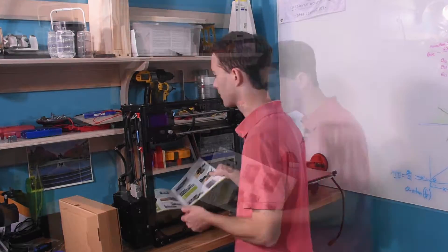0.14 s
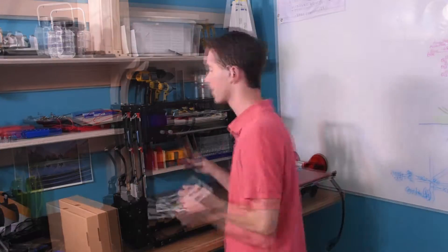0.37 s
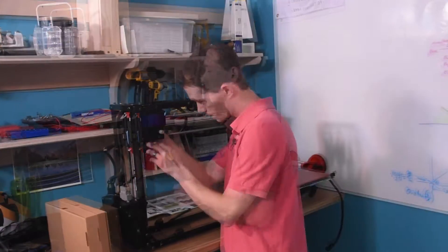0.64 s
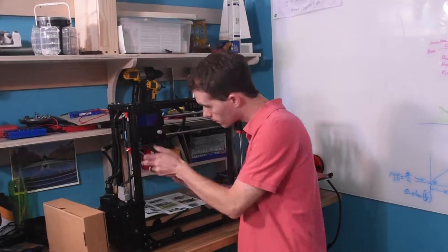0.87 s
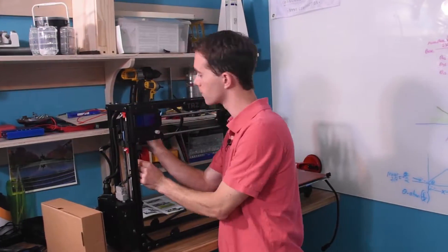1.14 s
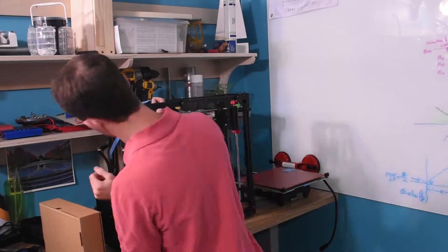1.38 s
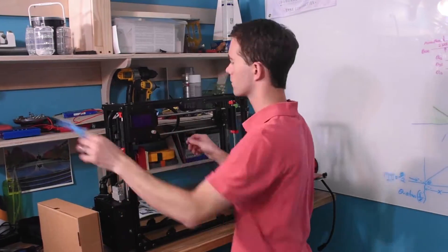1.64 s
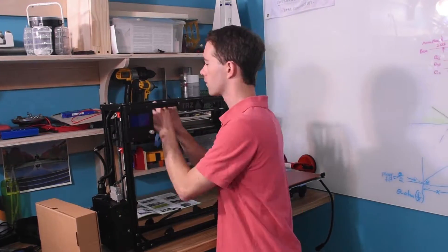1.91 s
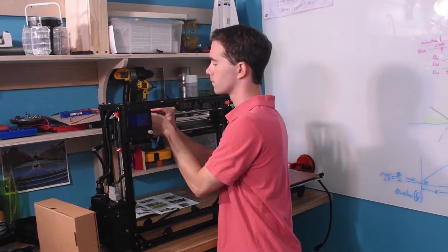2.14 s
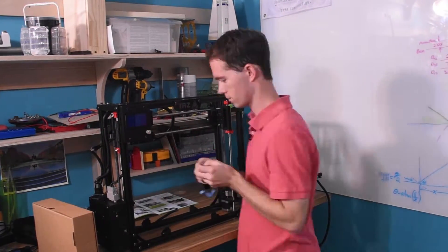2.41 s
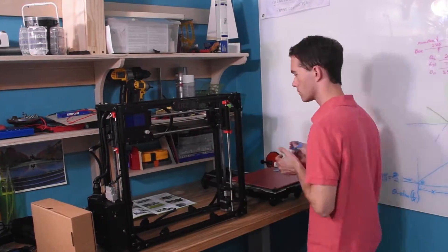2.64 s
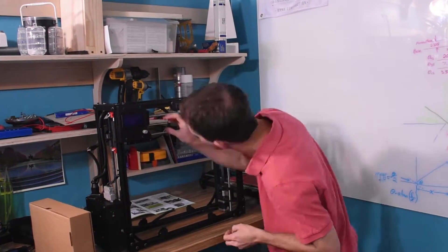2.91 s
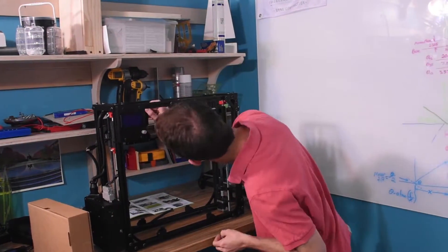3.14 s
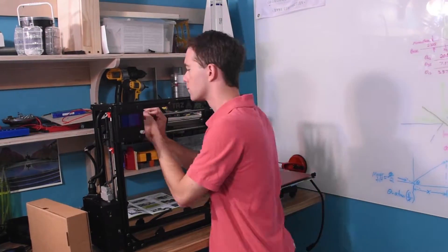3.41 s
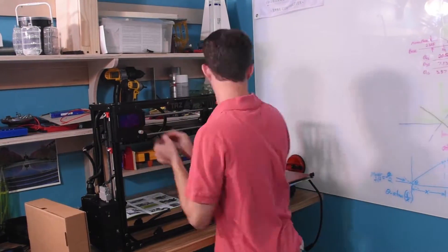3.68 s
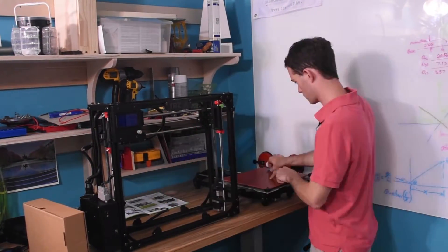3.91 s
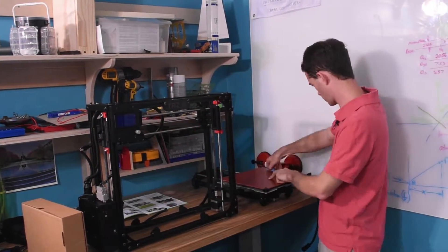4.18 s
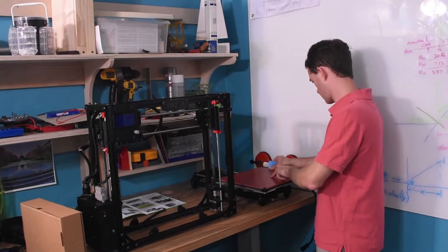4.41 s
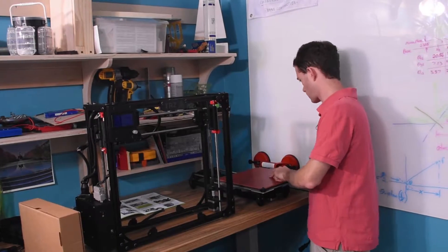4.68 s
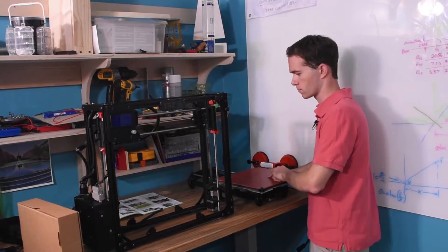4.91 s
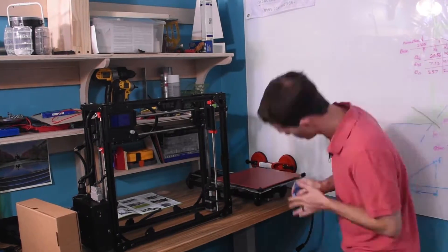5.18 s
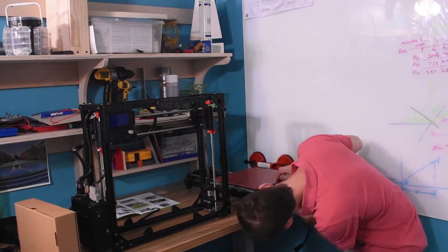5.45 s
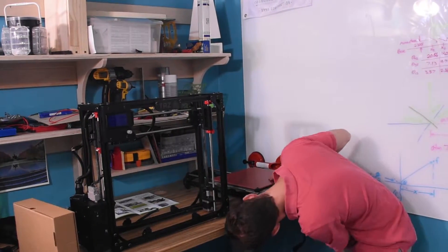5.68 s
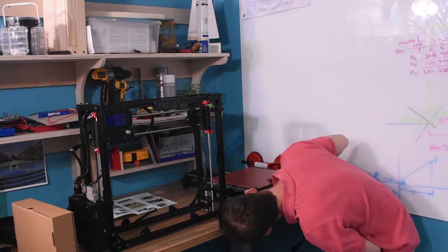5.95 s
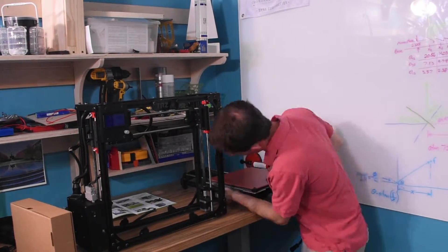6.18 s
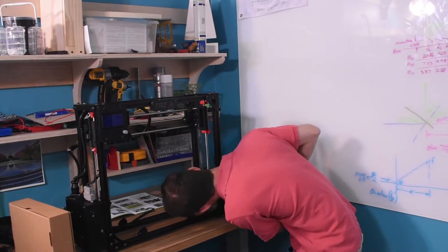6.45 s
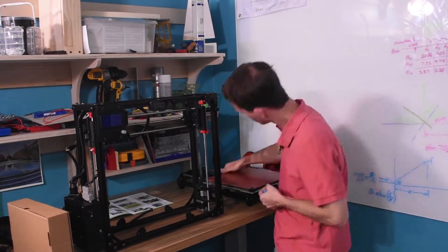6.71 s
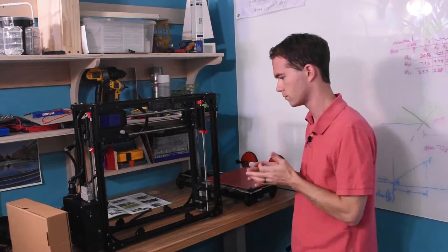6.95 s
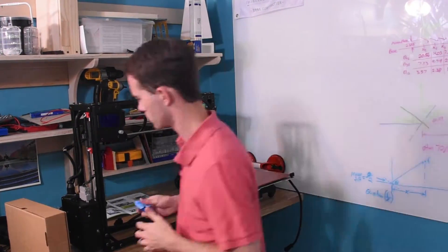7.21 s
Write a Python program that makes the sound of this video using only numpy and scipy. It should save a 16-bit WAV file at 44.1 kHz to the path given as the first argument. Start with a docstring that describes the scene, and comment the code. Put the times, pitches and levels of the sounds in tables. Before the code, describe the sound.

Paper rubs softly and a booklet smacks a wooden bench, the hardest hit slightly saturated. The sound then jumps to time-lapse handwork at a metal frame: tiny high snaps, short crackling runs, faint taps of small parts and a growing peel of sticky tape. The indoor echo turns short and high, above quiet thin hiss, unsteady hum and an intermittent whistle.

```python
"""In a workshop, a paper booklet rustles and is knocked down on a wooden bench; then the sound jumps to tape work
sped up like a time-lapse, all high and thin: sticky tape is picked and peeled off a metal frame over a thin hiss.
Paper is filtered random clicks, a blow is a burst of noise plus dying sines, and tape is short snaps of noise,
crackling runs and a steady pull. Small parts ring when tapped. Behind the work are patchy hiss, a wavering hum,
faint steady tones and a thin whistle that comes and goes."""
import sys
import numpy as np
from scipy import signal
from scipy.io import wavfile
from scipy.ndimage import uniform_filter1d

SR = 44100
rng = np.random.default_rng(int(sys.argv[2]) if len(sys.argv) > 2 else 0)


def field_ratio(decibels):
    """Amplitude ratio for a level in dB (20 dB per decade); scalars and array-likes work."""
    return 10 ** (np.asarray(decibels, dtype=float) / 20)


def unload_wav(signal):
    """Save mono or channel-first audio to the path in sys.argv[1] as 16-bit WAV at rate SR, clipped to [-1, 1]."""
    wavfile.write(
        sys.argv[1],
        SR,
        np.round(np.clip(np.atleast_2d(signal).T, -1, 1) * 32767).astype(np.int16),
    )


N = 323253  # samples, about 7.3 s
T = np.arange(N) / SR  # time of each sample, s
HZ = np.fft.rfftfreq(4096, 1 / SR)  # frequencies at which filters are drawn
CHANGE_S = .481  # the bench sound stops here and the sped-up tape work takes over


# the ticks of tape letting go that stand out:
# (t/s, peak level/dB, brightness/octaves above 1 kHz, held to 4 at most)
TAPE_TICKS = [(0.941, -28, 2.53), (1.0075, -33, 2.95), (1.183, -21.5, 3.15), (1.2286, -22.5, 1.93),
              (1.6534, -28, 2.5), (1.8073, -23.5, 2.38), (2.0918, -26, 3.05), (2.2404, -23, 2.9),
              (2.3626, -24.5, 1.73), (2.595, -22, 3.9), (2.6872, -14, 2.97), (2.7865, -22, 3.6),
              (2.8608, -20.5, 3.7), (2.938, -31.5, 4.2), (2.9654, -27.5, 4.4), (3.016, -39, 1.9),
              (3.304, -29, 4), (3.7782, -13, 3.7), (3.8364, -26, 3.54), (3.866, -19.5, 3.9),
              (4.1165, -18.5, 2.97), (4.3113, -20, 2.93), (4.3518, -21, 3.27), (4.3762, -24.5, 2.8),
              (4.3943, -24, 2.7), (4.4174, -20, 2.44), (4.4435, -24, 2.1), (4.4617, -26, 1.8),
              (4.5033, -22.5, 2.73), (4.5455, -5, 3.3), (4.556, -18, 2.7), (4.6134, -27.5, 2.6),
              (4.9093, -27, 2.38), (5.0416, -8.5, 3.6), (5.1165, -29, 2.8), (5.195, -17, 3.65),
              (5.2557, -23, 3.1), (5.342, -17, 2.2), (5.403, -17.5, 3), (5.4368, -19, 4),
              (5.4487, -21, 3.26), (5.4677, -24, 4.3), (5.5052, -17, 3.32), (5.6533, -19, 3.6),
              (5.729, -22.5, 3.4), (5.8026, -22, 3.6), (5.866, -16, 2.73), (5.889, -18, 3),
              (5.8975, -12.5, 2.84), (5.9416, -20, 4.1), (5.9975, -17, 3.9), (6.0126, -19, 3.35),
              (6.026, -22.5, 4.4), (6.0564, -18.5, 2.7), (6.129, -25.5, 2.9), (6.213, -27, 1.74),
              (6.2337, -24.5, 3), (6.2547, -11, 3.1), (6.281, -16.5, 2.8), (6.3096, -11, 3.6),
              (6.333, -27, 3.4), (6.368, -27.5, 3.6), (6.431, -29.5, 2.8), (6.5131, -5.5, 2.55),
              (6.5962, -10.5, 2.14), (6.6596, -18.5, 2.35), (6.718, -19.5, 2.3), (6.7557, -13, 4.2),
              (6.7673, -11, 3.96), (6.8032, -12, 3.85), (6.8216, -21, 3.8), (6.8576, -14.5, 3.5),
              (6.8872, -12.5, 3.68), (6.913, -15, 3.2), (6.9458, -17.5, 3.4), (6.9963, -8, 3.32),
              (7.0115, -10, 4.9), (7.0397, -10, 3.64), (7.06, -10, 3.6), (7.0915, -9.5, 4.6),
              (7.1096, -9, 3.67), (7.1433, -11.5, 4), (7.2502, -20.5, 3.34)]


def ticks():
    """Each tick is a snap of well under a millisecond, with a faint creak before and a rattle after."""
    t = np.arange(-200, 700) / SR  # the snap itself is at t = 0
    out = np.zeros(N)
    for s, db, octaves in TAPE_TICKS:
        creak = 0.062 * field_ratio(60 * t / 0.009)
        snap_and_rattle = field_ratio(-60 * abs(t) / 0.0015) + 0.14 * field_ratio(-60 * abs(t) / 0.024)
        noise = rng.standard_normal(len(t)) * np.where(t < 0, creak, snap_and_rattle)
        snap = tinted(noise, hump(octaves, below_db=9.5, above_db=5.5))
        tick = through_frame(snap, share_db=-2.5)
        add(out, s + t[0], field_ratio(db) * tick / abs(tick).max())
    return out


# crackling runs and scuffs:
# (t/s, length/s, level/dB, brightness/octaves above 1 kHz, held to 4 at most)
CRACKLING_RUNS = [(0.477, 0.01, -28, 2.4), (0.52, 0.007, -43, 2.2), (0.845, 0.044, -40.5, 2.2),
                  (1.229, 0.053, -49, 2.7), (1.613, .04, -54.5, 2.6), (1.869, 0.032, -55.5, 0.92),
                  (2.036, .015, -53, 2.46), (2.35, 0.012, -42, 1.77), (2.577, 0.027, -48.5, 1.55),
                  (2.744, 0.021, -34.5, 3.56), (2.792, 0.057, -46.5, 3.67), (2.871, 0.041, -52.5, 2.6),
                  (3.284, 0.042, -60, 0.71), (4.032, 0.026, -46.5, 2.27), (4.111, 0.014, -39, 2.9),
                  (4.381, 0.075, -51.5, 2.4), (4.534, 0.024, -32.5, 2.66), (4.748, 0.028, -49, 1.93),
                  (4.896, 0.033, -45, 2.1), (5.035, .013, -30.5, 2.18), (5.109, 0.02, -46, 1.6),
                  (5.186, 0.018, -39.5, 1.74), (5.233, 0.039, -44, 2.63), (5.31, 0.05, -47, 1.44),
                  (5.386, 0.022, -43, 3.13), (5.644, 0.012, -34, 2.6), (5.728, 0.0082, -37.5, 3.04),
                  (5.801, 0.09, -48.5, 2.8), (5.894, 0.023, -33, 1.66), (5.998, 0.018, -42, 4.5),
                  (6.63, 0.012, -44, 3.2), (6.666, 0.026, -35, 1.83), (6.761, 0.054, -48.5, 3.4),
                  (6.876, .065, -45, 3.9), (6.975, 0.017, -28, 4.5), (7.014, .055, -39.5, 3.8),
                  (7.075, 0.068, -38, 3.94)]


def runs():
    """Glue threads tear in a spiky flurry that swells and trails off."""
    rise_share = 0.29  # part of the run's length spent swelling
    threads = grains(per_s=1100, spread_db=4.5) + 0.32 * rng.standard_normal(N)
    out = np.zeros(N)
    for s, length, db, octaves in CRACKLING_RUNS:
        t = np.arange(round((length + .04) * SR)) / SR  # leaves room for the trailing end
        swell = np.clip(t / (0.0016 + rise_share * length), 0, 1)
        trail = field_ratio(-60 * np.maximum(t - length, 0) / 0.026)
        piece = threads[round(s * SR):][:len(t)]
        flurry = tinted(piece, hump(octaves, below_db=8, above_db=4.5))
        flurry = evened(through_frame(flurry, share_db=-2.5))
        add(out, s, field_ratio(db) * flurry * swell * trail)
    return out


# steady pull on the tape: (t/s, level/dB, dullness/0 to 1)
TAPE_PULL = [(0.47, -64, 0.92), (3.68, -73.5, 0.08), (5.07, -59, 0.82), (6.58, -61, 0.4), (6.91, -63, 0.5),
             (7.33, -56, 0.01)]
# relative spectrum of the tearing film: (f/Hz, level/dB per Hz)
FILM_SPECTRUM = [(500, -49), (3000, -25.5), (6000, -14), (10000, 1.5), (14000, 2.5), (17000, -12.5)]
# relative spectrum of the fingers: (f/Hz, level/dB per Hz)
FINGER_SPECTRUM = [(300, -29.5), (1200, -7.5), (2800, 0.5), (5500, -1), (9000, -12), (17000, -19)]


def peel():
    """Glue threads tear in dense random snaps; a duller pull is more finger than film."""
    s, db, dull = np.transpose(TAPE_PULL)
    level = field_ratio(np.interp(T, s, db))
    dull = np.clip(np.interp(T, s, dull), 0, 1)
    film = evened(tinted(grains(per_s=2700, spread_db=7.0), FILM_SPECTRUM))
    fingers = evened(tinted(grains(per_s=3700, spread_db=8.0), FINGER_SPECTRUM))
    return level * (np.sqrt(1 - dull) * film + np.sqrt(dull) * fingers)


# taps on small loose parts: (t/s, peak level/dB, f/Hz)
PART_TAPS = [(4.046, -47, 2750), (4.055, -41, 4160), (4.1154, -28, 4220), (4.312, -36, 4155),
             (4.336, -45, 4190), (2.354, -56, 612), (4.906, -32, 4400), (5.9, -37.5, 2000),
             (6.677, -32, 1343), (6.801, -43, 4200)]


def taps():
    """Each small part rings briefly on its own pitch, with a weaker ring just above it."""
    out = np.zeros(N)
    for s, db, hz in PART_TAPS:
        modes = [(hz, 0, .045), (1.04 * hz, -7, .03)]
        add(out, s, field_ratio(db) * ring(modes, length=4000))
    return out


# resonances of the metal frame: (f/Hz, width/Hz, relative level/dB before each touch varies it)
FRAME_RESONANCES = [(1381, 300, 6), (2000, 490, -1), (2777, 360, 3.5), (4200, 110, -6), (6213, 300, -12)]


def through_frame(x, share_db):
    """Adds the frame's resonances, each stirred by a different amount at every touch."""
    out = x.copy()
    for hz, width, db in FRAME_RESONANCES:
        b, a = signal.iirpeak(hz, hz / width, SR)
        luck = field_ratio(4 * rng.standard_normal())
        out += field_ratio(db + share_db) * luck * signal.lfilter(b, a, x)
    return out


# pages rubbing swell once and die away: (t/s, level/dB)
RUSTLE_LEVEL = [(0, -40), (0.039, -44), (.13, -41.5), (.3, -61.5)]
# relative spectrum of rubbing paper: (f/Hz, level/dB per Hz)
PAPER_SPECTRUM = [(35, -80.5), (60, -42), (248, -9.5), (1020, -4), (1200, -10.5), (2360, -20.5),
                  (11500, -38), (15500, -41.5)]


def rustle():
    """Rubbing pages make a stream of random clicks, coloured like paper."""
    s, db = np.transpose(RUSTLE_LEVEL)
    paper = evened(tinted(grains(per_s=2500, spread_db=3.0), PAPER_SPECTRUM))
    return paper * field_ratio(np.interp(T, s, db)) * (T < s[-1])


# flicks of pages and blows on the bench: (t/s, peak level/dB of the crack, tilt/dB per octave)
BOOKLET_BLOWS = [(.062, -31, 5), (0.0998, -19.5, 3), (.122, -24.5, 4.5), (.133, -29, 4), (.148, -32, 5),
                 (0.307, -23, 3.5), (0.3379, 6, -1), (0.356, -7, -4.5), (.432, -20, -1.5),
                 (.473, -14.5, -4.5)]
# relative spectrum of a crack before its tilt: (f/Hz, level/dB per Hz)
CRACK_SPECTRUM = [(30, -55), (200, -26.5), (970, 4), (2500, -6), (4500, -25), (14500, -43), (16500, -71)]
# ringing tones of the bench top: (f/Hz, relative level/dB, time to fall 60 dB/s before it is shortened below)
BENCH_MODES = [(657, -8.5, .4), (821.2, -15, 0.33), (903, -2.5, 0.49), (994, -4.5, 0.68),
               (1033.8, -6.5, 0.28), (1234, -4, 0.33), (1508, -1.5, 0.29), (1724, -6, 0.22),
               (1815, -2.5, .25)]


def blows():
    """Each blow cracks as a short scrape of noise and rings the bench top; early flicks barely ring it."""
    scrape_fade = field_ratio(-60 * np.arange(1500) / SR / 0.037)
    out = np.zeros(N)
    for s, db, tilt_db in BOOKLET_BLOWS:
        scrape = rng.standard_normal(1500) * scrape_fade
        crack = tinted(scrape, [(hz, d + tilt_db * np.log2(hz / 1000)) for hz, d in CRACK_SPECTRUM])
        add(out, s, field_ratio(db) * crack / abs(crack).max())
        # every tone sounds twice, each time slightly off pitch
        modes = [(hz * rng.uniform(.97, 1.03), d, 0.21 * t60) for hz, d, t60 in BENCH_MODES + BENCH_MODES]
        ring_db = -6 if s > .2 else -11  # blows after 0.2 s land on the bench
        add(out, s, field_ratio(db + ring_db) * ring(modes, length=8000))
    return out


def bench():
    """Page rustle and blows echo in the workshop while a low drone creeps in, until all stops at the change."""
    dry_sound = rustle() + blows()
    echo = field_ratio(-5.5) * room(dry_sound, speed=1, delay_s=.008)
    drone = field_ratio(np.interp(T, (.16, .23, .47), (-75, -56, -54))) * fuzzy(262, width=61)
    return (dry_sound + echo + drone) * np.clip((CHANGE_S - T) / 0.0032, 0, 1)


# how long the workshop echoes at speed 1: (f/Hz, time to fall 60 dB/s)
ECHO_TIMES = [(60, 0.17), (300, 0.49), (1000, 0.43), (2500, 0.35), (6000, 0.3), (15000, 0.5)]


def room(x, speed, delay_s):
    """Workshop echo as a noise tail dying band by band; a higher speed raises and shortens it."""
    noise = rng.standard_normal(SR // 2) * (np.arange(SR // 2) > delay_s * SR)
    hz, t, z = signal.stft(noise, SR, nperseg=128)
    fade = field_ratio(-60 * t * speed / read(ECHO_TIMES, hz / speed)[:, None])
    tail = signal.istft(z * fade, SR, nperseg=128)[1]
    return signal.oaconvolve(x, tail / np.linalg.norm(tail))[:N]


# relative spectrum of the room hiss: (f/Hz, level/dB per Hz)
HISS_SPECTRUM = [(30, -52), (150, -47), (390, -25), (610, -9), (1290, -4), (2600, -4.5), (3730, -7),
                 (5300, -8.5), (13800, -18), (15500, -22.5), (16500, -40)]


def hiss():
    """Thin noise whose loudness is patchy in both time and pitch."""
    a, b, patches = rng.standard_normal((N // 256 + 5, 513, 3)).T
    patches = uniform_filter1d(patches, size=10, axis=0)  # smooth over pitch
    patches = evened(uniform_filter1d(patches, size=8, axis=1))  # smooth over time
    z = (a + 1j * b) * field_ratio(read(HISS_SPECTRUM, HZ[::4])[:, None] + 3.53 * patches)
    noise = signal.istft(z, nperseg=1024, noverlap=768)[1][:N]
    return field_ratio(-61.5) * evened(noise)


# the hum swells now and then, on top of its rest level: (t/s, length/s, added level/dB)
HUM_SWELLS = [(0.497, .3, -65), (1.22, 0.29, -63), (1.801, .15, -67), (3.27, 0.11, -64.5),
              (3.96, 0.27, -77), (5.07, .25, -62.5), (6.9, 0.36, -71.5)]


def hum():
    """A narrow band of noise wavers by itself and swells now and then above its rest level."""
    rest_db, edge_s = -76.5, .05
    swells = sum(field_ratio(db) * ((T > s) & (T < s + length)) for s, length, db in HUM_SWELLS)
    swells = uniform_filter1d(swells, size=round(edge_s * SR))
    return (field_ratio(rest_db) + swells) * fuzzy(1350, width=150)


# faint steady tones: (f/Hz, level/dB)
FAINT_TONES = [(1077, -78.5), (1674, -79), (2686, -76.5), (5357, -74)]


def tones():
    """Faint sines, each wavering a little in level."""
    return sum(field_ratio(db) * steady(hz, waver_db=2.5) for hz, db in FAINT_TONES)


# when the thin whistle is heard: (start t/s, end t/s, level/dB)
WHISTLE_TIMES = [(.68, .86, -69), (1.55, 1.66, -71), (1.94, 2.14, -68), (2.63, 2.84, -68),
                 (3.36, 3.55, -68), (6.5, 6.6, -68)]


def whistle():
    """A thin, wavering sine that comes and goes with softened edges."""
    gate = sum(field_ratio(db) * ((T > start) & (T < end)) for start, end, db in WHISTLE_TIMES)
    return uniform_filter1d(gate, size=250) * steady(4590, waver_db=3.0, size=900)


def background():
    """Hiss, hum, steady tones and whistle add up behind the tape work."""
    return hiss() + hum() + tones() + whistle()


def grains(per_s, spread_db):
    """Random clicks of either sign, a few of them large, rms 1."""
    size = field_ratio(spread_db * np.minimum(rng.exponential(1, N), 4))
    sign = rng.choice([-1., 1.], N)
    happens = rng.random(N) < per_s / SR
    return evened(size * sign * happens)


def ring(modes, length):
    """Sum of dying sines with a soft start, peak 1; modes hold (Hz, dB, seconds to fall 60 dB)."""
    t = np.arange(length) / SR
    out = np.zeros(length)
    for hz, db, t60 in modes:
        out += field_ratio(db - 60 * t / t60) * np.sin(2 * np.pi * (hz * t + rng.random()))
    out = out * np.sin(np.pi / 2 * np.clip(t / .0015, 0, 1)) ** 2
    return out / abs(out).max()


def fuzzy(hz, width):
    """A narrow band of noise around a tone, rms 1; width is in Hz."""
    r = np.exp(-np.pi * width / SR)
    noise = rng.standard_normal(N) + 1j * rng.standard_normal(N)
    slow = signal.lfilter([1], [1, -2 * r, r * r], noise)
    return evened((slow * np.exp(2j * np.pi * hz * T)).real)


def steady(hz, waver_db, size=2500):
    """A tone whose level wavers a little, rms about 1; size is the smoothing in samples."""
    drift = evened(uniform_filter1d(rng.standard_normal(N), size=size))
    return np.sqrt(2) * field_ratio(waver_db * drift) * np.sin(2 * np.pi * hz * T)


def hump(octaves, below_db, above_db):
    """Spectrum that peaks some octaves above 1 kHz and slopes off on both sides, unevenly at every touch."""
    hz = 1000 * 2 ** min(octaves, 4)
    shape = [(30, -3 * below_db - 27.5), (hz / 8, -3 * below_db), (hz / 1.13, 0), (hz * 1.15, 0),
             (hz * 8, -3 * above_db)]
    steps = np.geomspace(30, 20000, num=28)
    uneven_db = 2.5 * rng.standard_normal(len(steps))
    return list(zip(steps, read(shape, steps) + uneven_db))


def tinted(x, points):
    """Filters a sound by a spectrum, keeping its length."""
    return signal.oaconvolve(x, colour(points))[:len(x)]


def colour(points):
    """Impulse response of a spectrum that starts at once, with no sound ahead of time (minimum phase)."""
    log_gain = np.log(field_ratio(np.maximum(read(points, HZ), -100)))
    full = np.concatenate([log_gain, log_gain[-2:0:-1]])
    return np.fft.ifft(np.exp(np.conj(signal.hilbert(full)))).real[:1024]


def read(points, hz):
    """Reads a spectrum between its points on a log-frequency axis."""
    f, value = np.transpose(points)
    return np.interp(np.log(hz + 1), np.log(f + 1), value)


def evened(x):
    """Scales to rms 1."""
    return x / np.sqrt(np.mean(x ** 2) + 1e-20)


def add(mix, s, sound):
    """Mixes a sound in at a time in seconds."""
    part = mix[max(round(s * SR), 0):][:len(sound)]
    part += sound[:len(part)]


def scene():
    """The bench, then tape work sped up like a time-lapse, its workshop echo shortened and raised in pitch."""
    hands = ticks() + runs() + peel() + taps()
    echo = field_ratio(-11.5) * room(hands, speed=3.2, delay_s=0.0011)
    work = hands + echo + background()
    work_fade_in = np.clip((T - CHANGE_S) / .004 + 1, 0, 1)
    return (bench() + work * work_fade_in)[None]


def band_limit(x):
    """A steep low-pass at the top of the band."""
    return signal.sosfilt(signal.butter(12, 16970, fs=SR, output="sos"), x)


def record(dry):
    """The input saturates softly on the hardest blow; then a low cut and a band limit."""
    top = .72  # level that the saturation never passes
    saturated = top * np.tanh(dry / top)
    low_cut = signal.lfilter(*signal.butter(1, 110, "high", fs=SR), saturated)
    edge = signal.firwin(255, 16400, window=("kaiser", 8), fs=SR)
    finished = signal.oaconvolve(low_cut, edge[None], "same")
    return band_limit(finished)


dry = scene()
out = record(dry)
unload_wav(out)
```